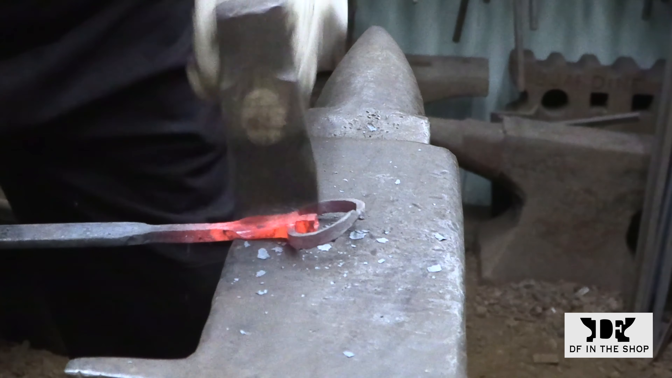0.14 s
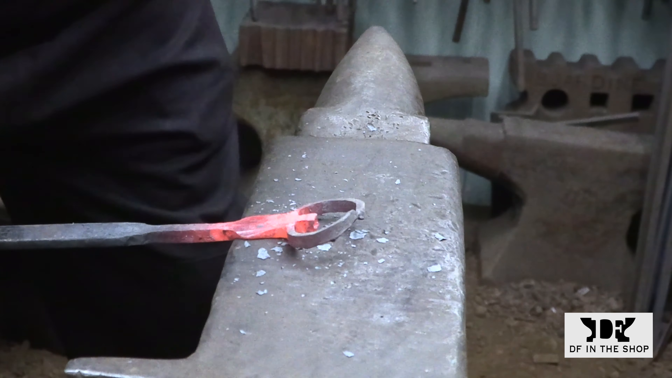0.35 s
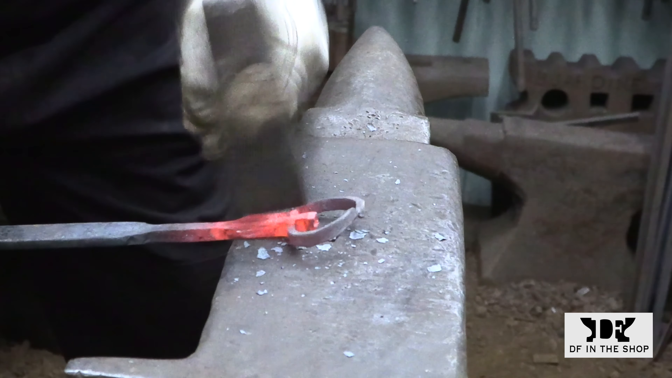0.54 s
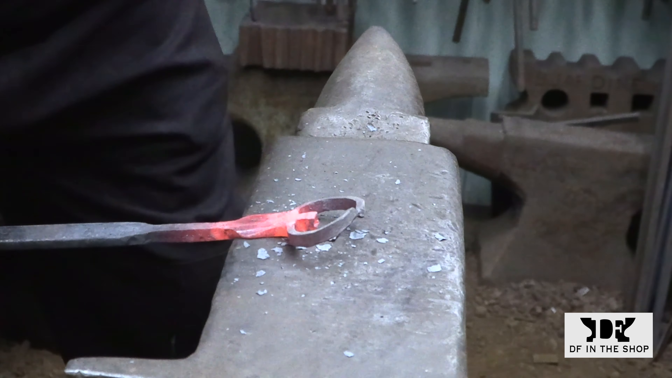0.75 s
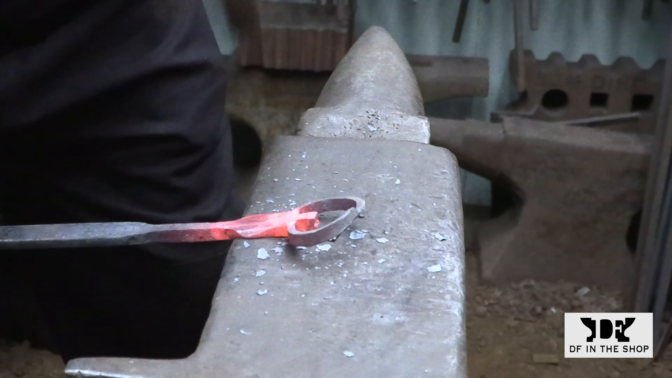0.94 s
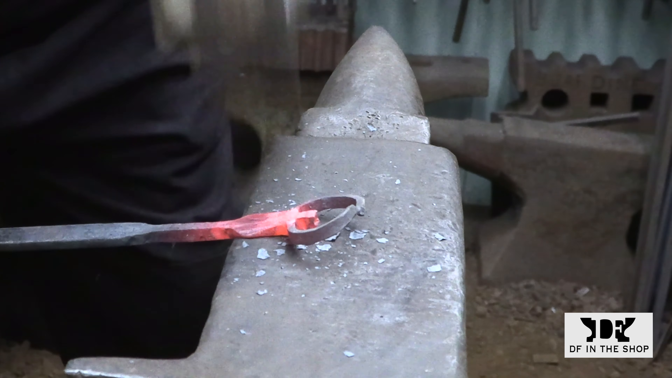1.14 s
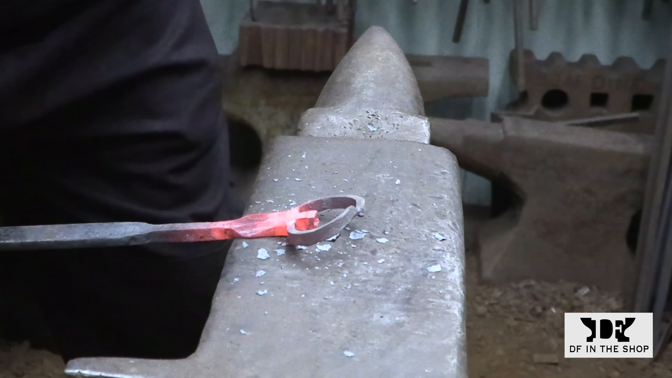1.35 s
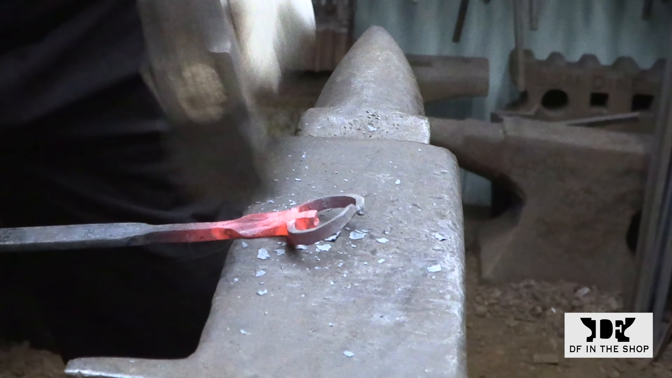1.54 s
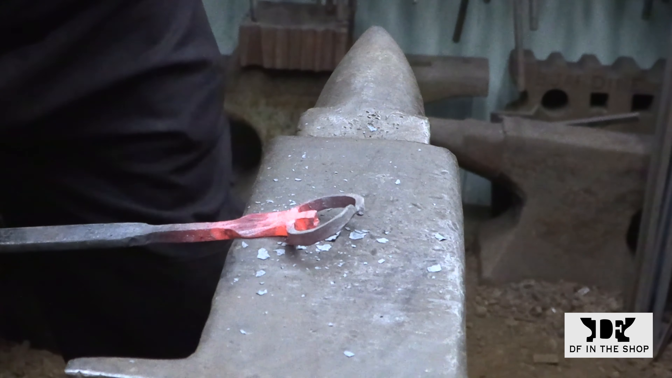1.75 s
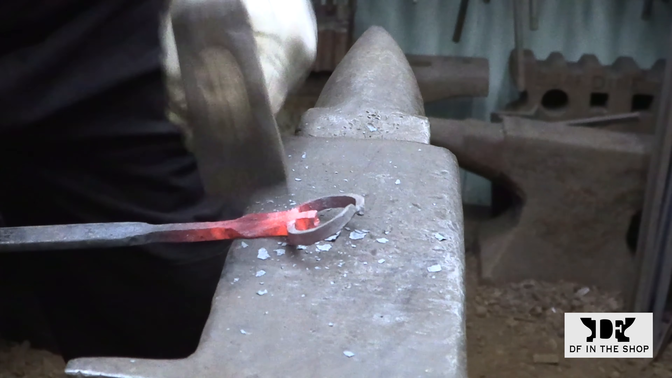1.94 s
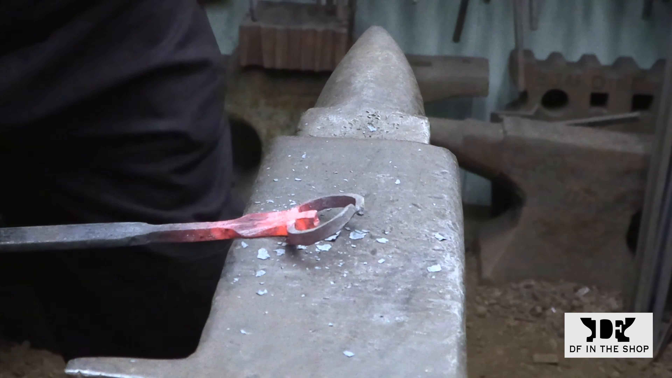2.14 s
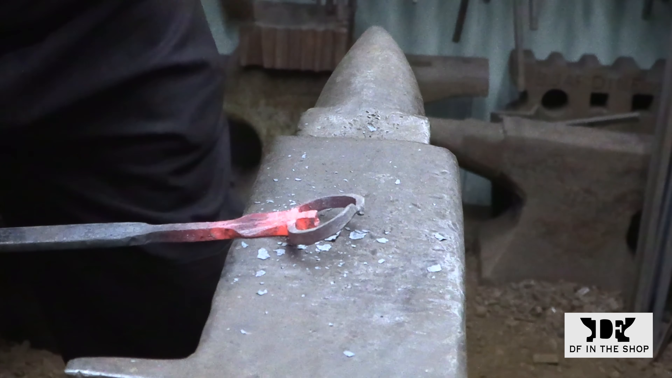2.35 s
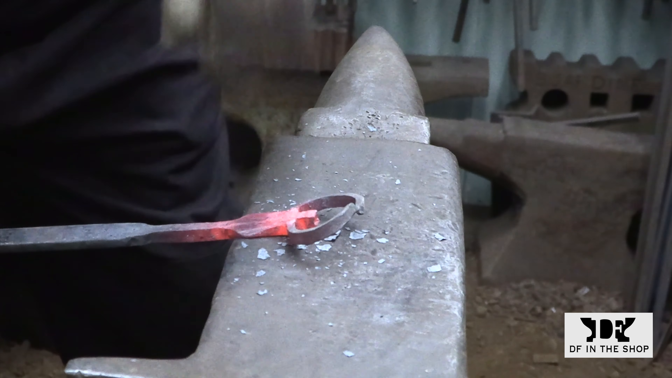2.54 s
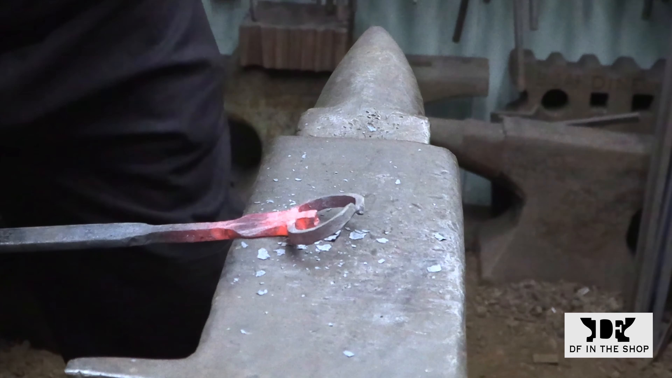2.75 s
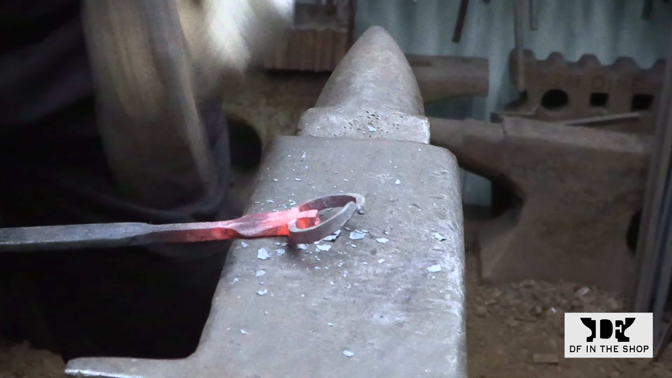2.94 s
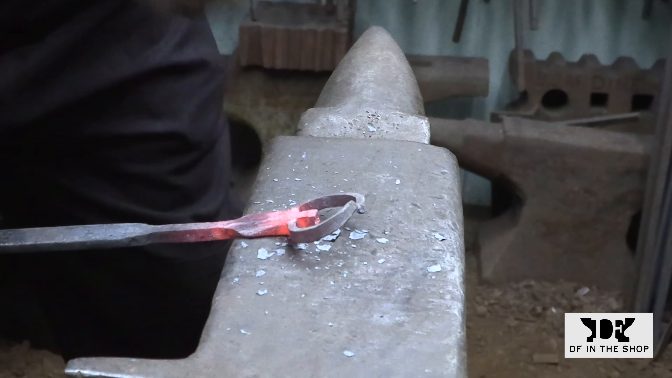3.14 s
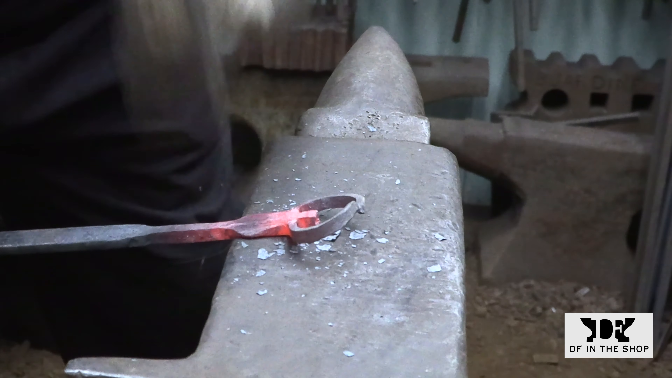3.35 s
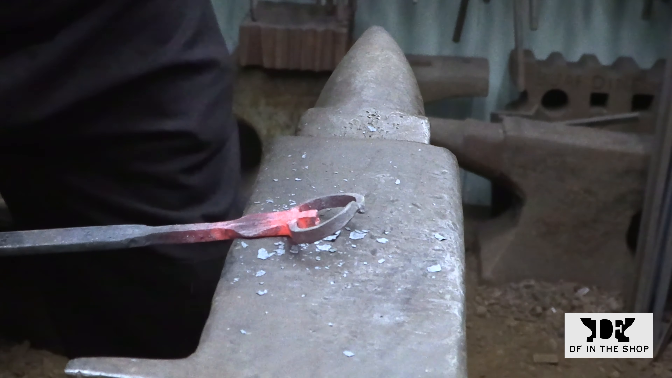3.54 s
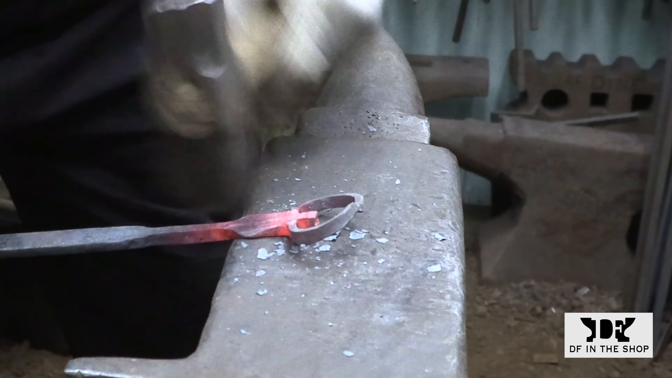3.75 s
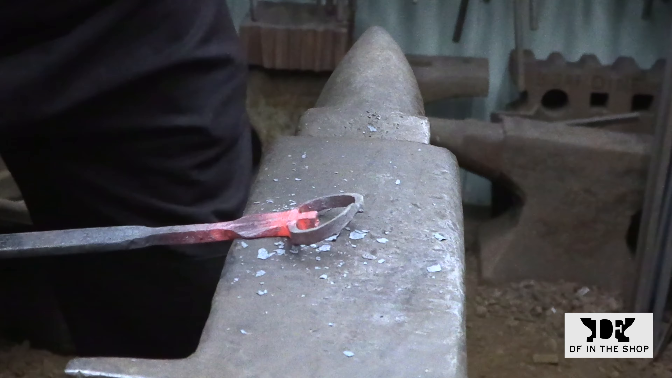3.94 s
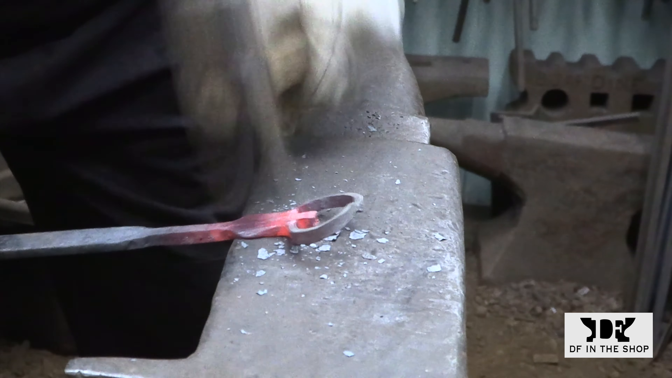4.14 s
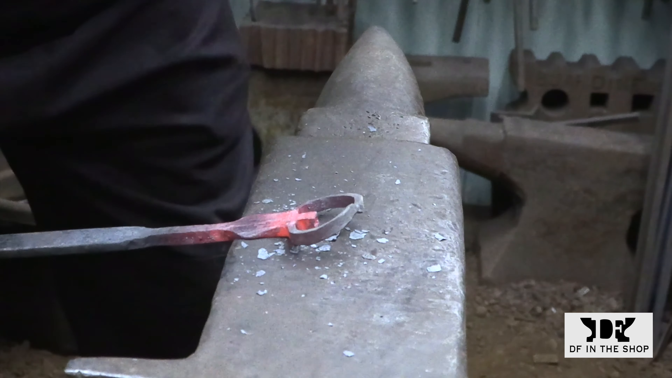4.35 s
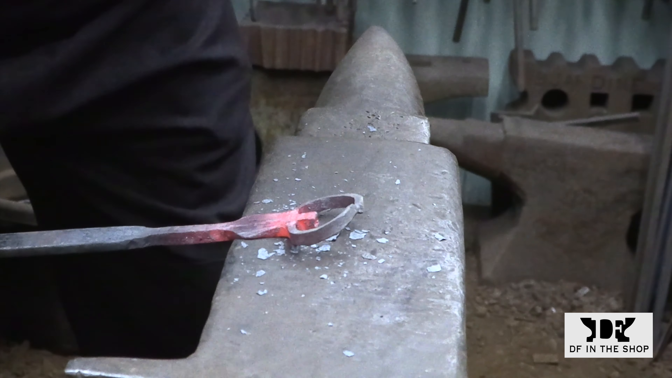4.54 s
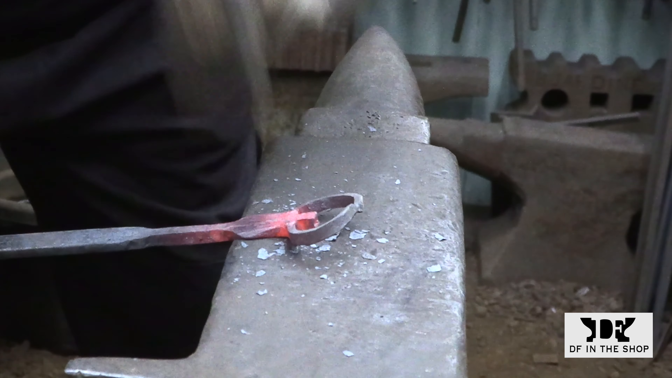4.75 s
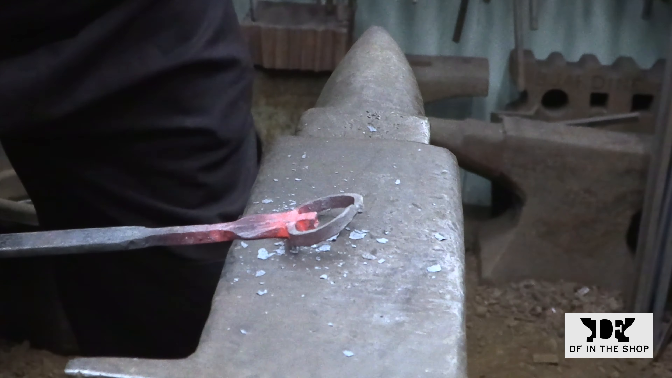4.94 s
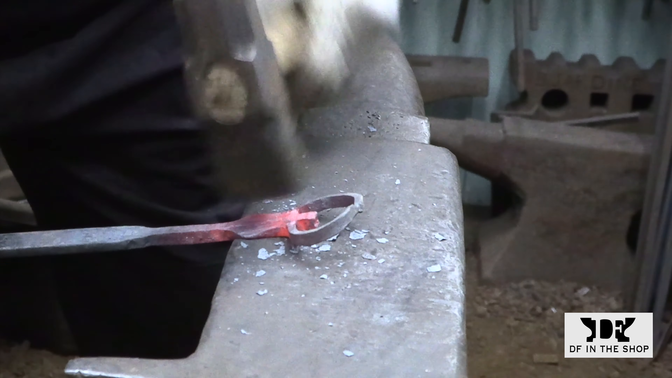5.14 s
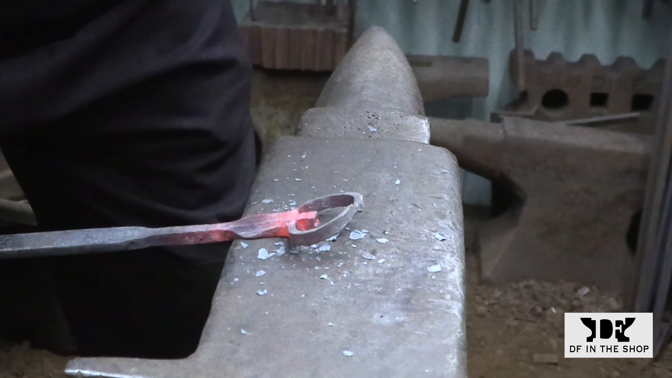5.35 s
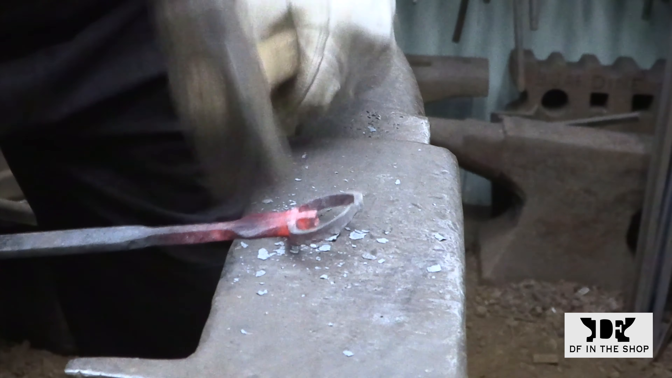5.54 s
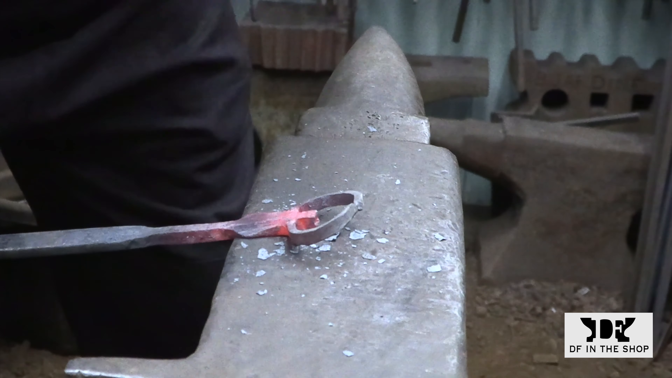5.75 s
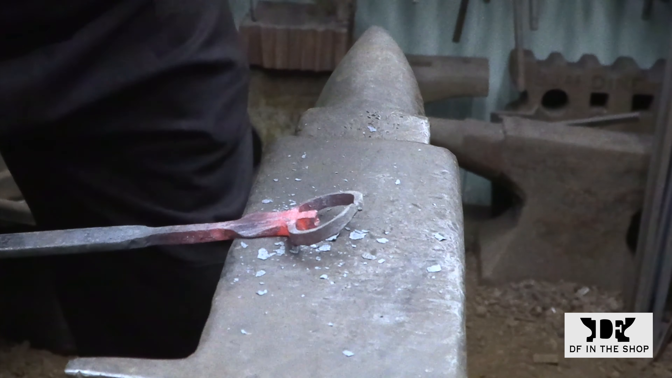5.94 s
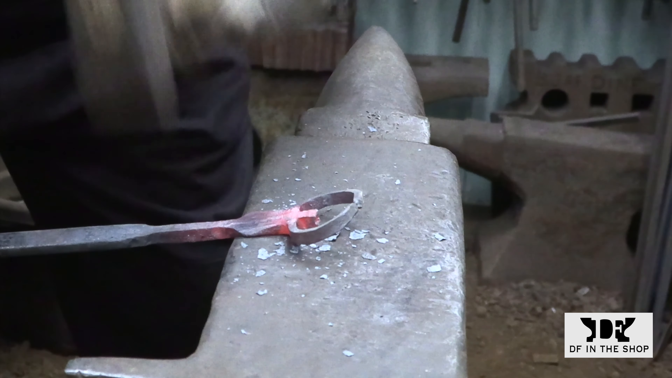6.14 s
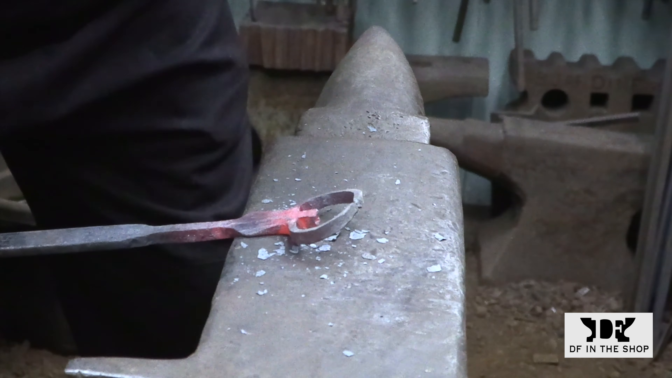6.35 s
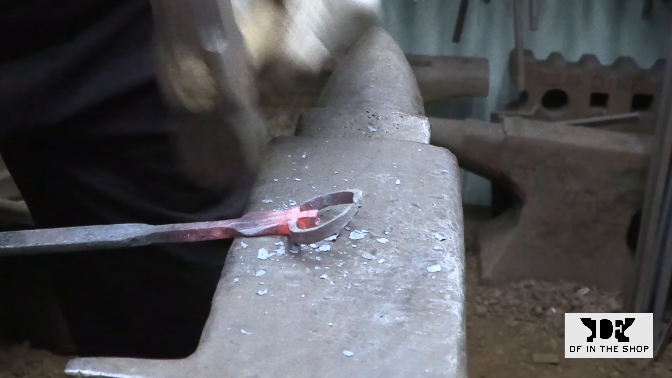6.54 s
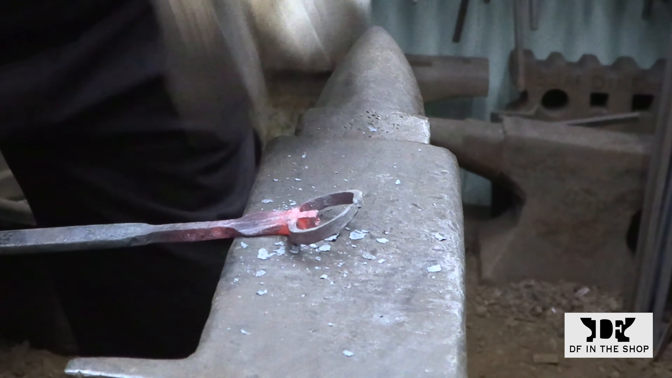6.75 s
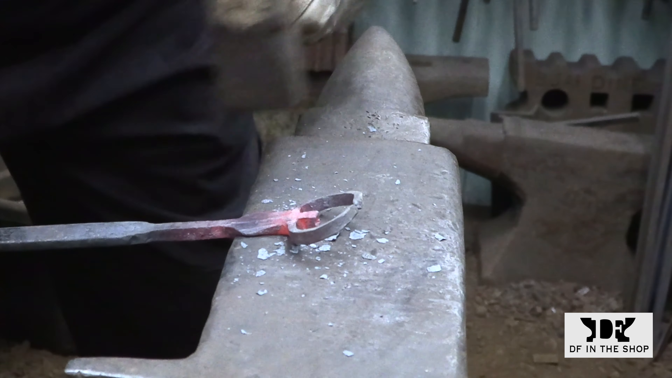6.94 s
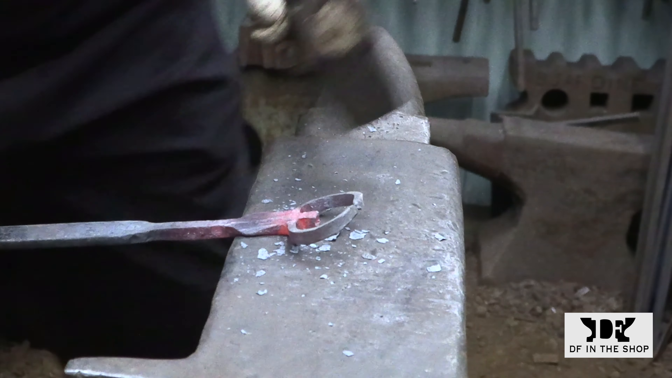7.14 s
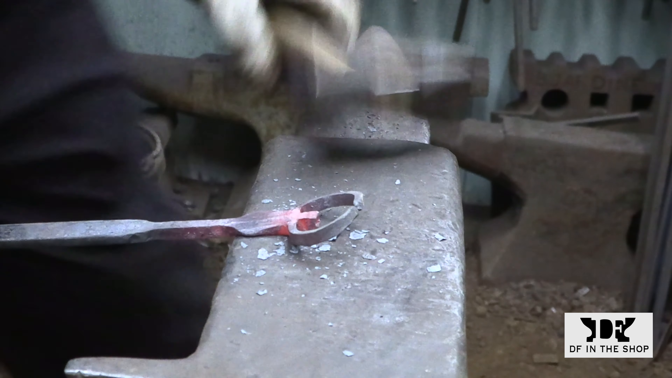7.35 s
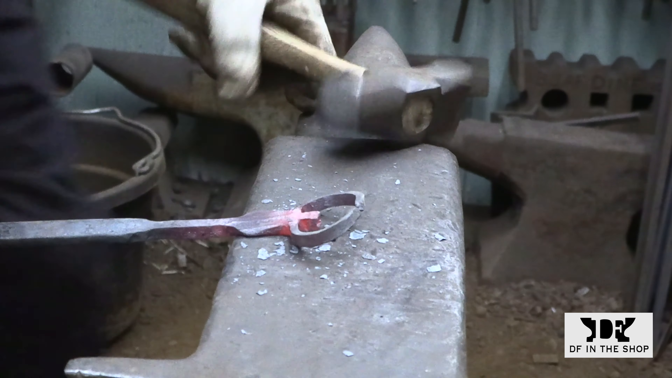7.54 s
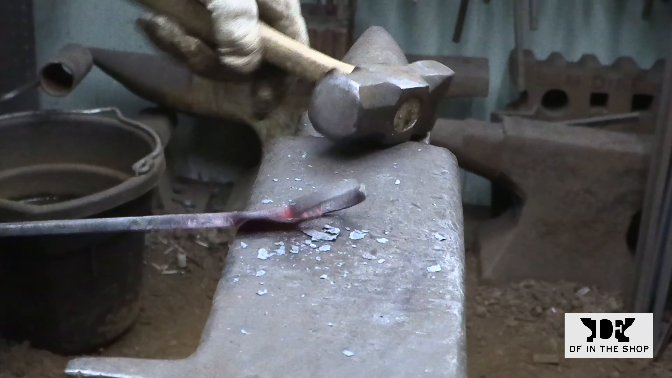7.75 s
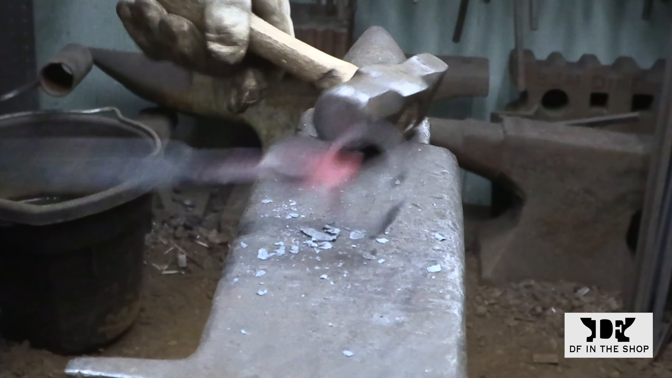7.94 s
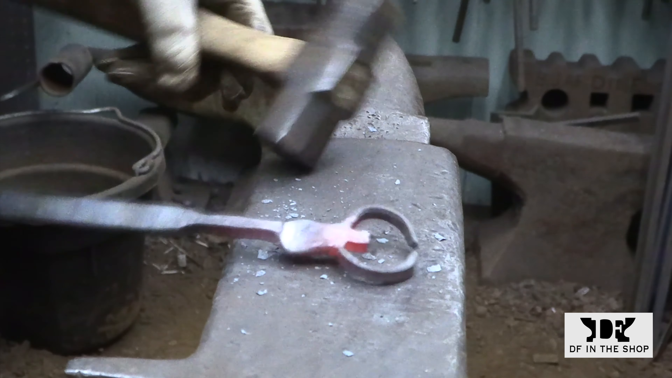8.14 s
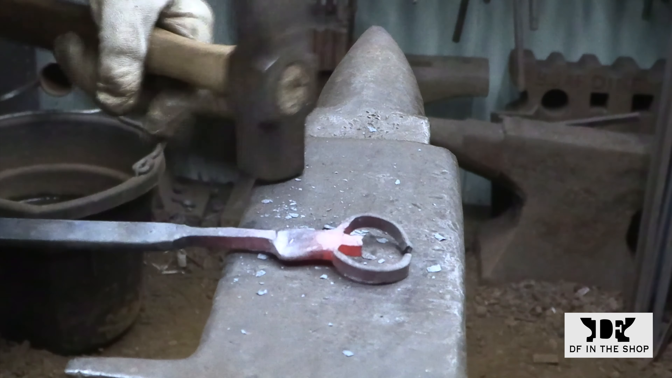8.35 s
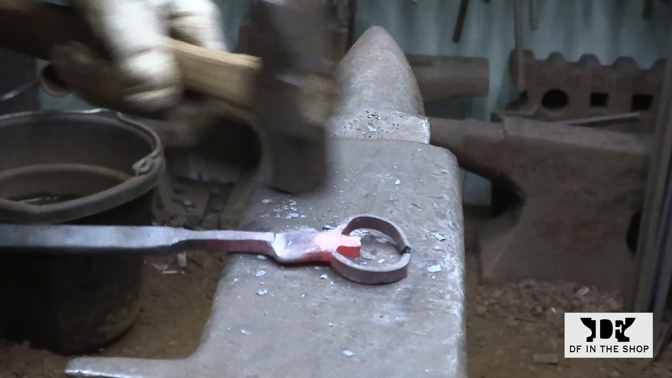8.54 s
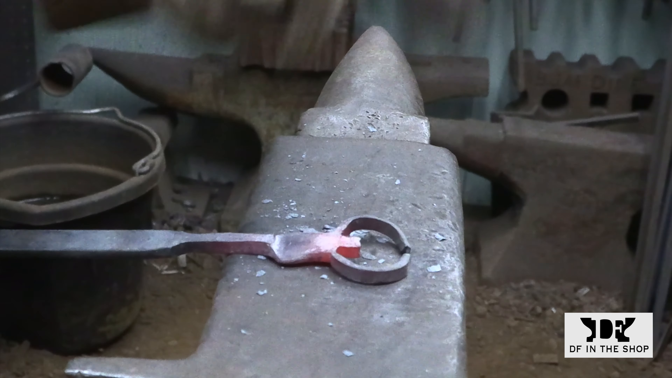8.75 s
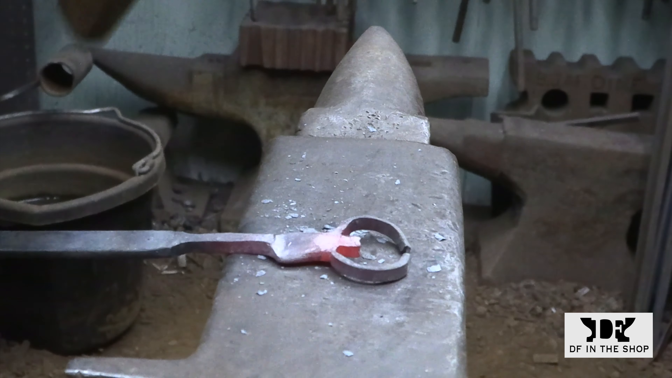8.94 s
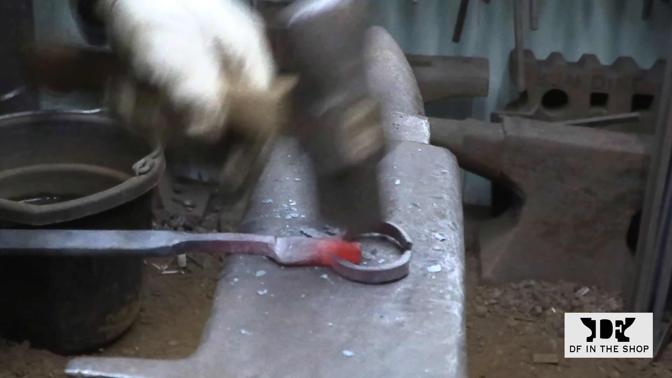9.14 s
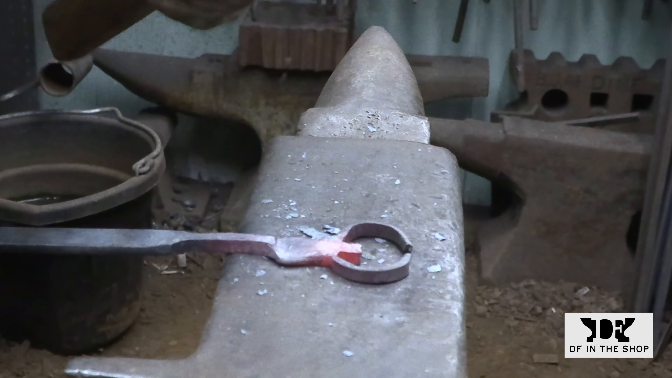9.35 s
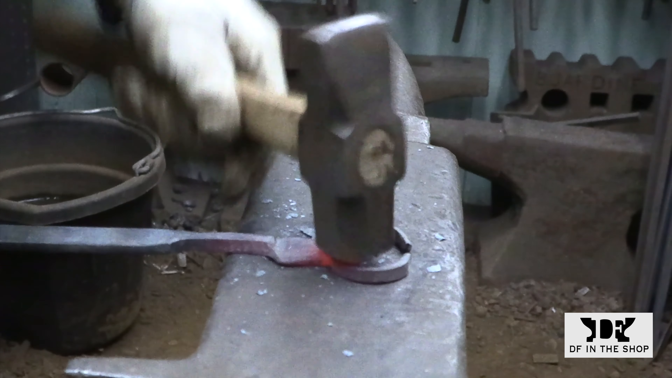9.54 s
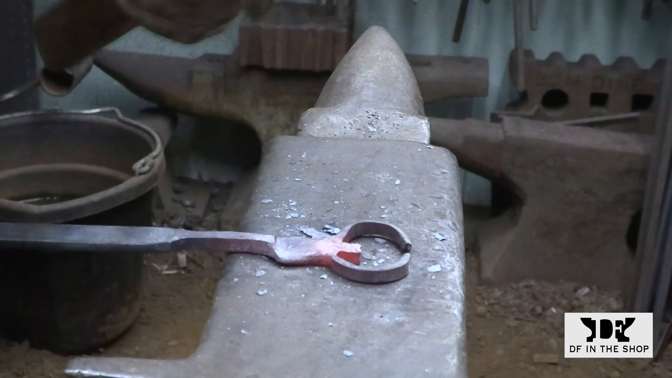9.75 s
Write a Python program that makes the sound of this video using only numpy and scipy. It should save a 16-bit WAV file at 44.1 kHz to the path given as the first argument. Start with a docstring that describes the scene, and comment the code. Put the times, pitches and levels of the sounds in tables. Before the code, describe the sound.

Close in a small forge, a hand hammer beats a hot steel bar on an anvil about twice a second, each blow a hard crack with a short, bright metallic clang. The last blows quicken and weaken. The hammer is laid down with a sharp clink and dull knocks, the bar scrapes and ticks as it is turned, then a flat thudding crack and one ringing blow finish.

```python
"""A small forge: a smith hammers a hot steel bar on an anvil, lays the hammer down, turns the bar, strikes twice more.
Contacts are a clean push plus scale crackle, convolved with one wall response.
Anvil, hammer head and bar ring as sums of decaying, wavering modes.
The bar's scrapes and the background are shaped noise; a gain control flattens the front of each blow."""
import sys
import numpy as np
from scipy import signal
from scipy.fft import rfft, irfft, next_fast_len
from scipy.io import wavfile
from scipy.ndimage import uniform_filter1d, minimum_filter1d, map_coordinates

SR = 44100
rng = np.random.default_rng(int(sys.argv[2]) if len(sys.argv) > 2 else 0)


def inscribe(sig):
    """Save sig as 16-bit PCM at rate SR to the path in sys.argv[1].

    A 1-D sig is mono; a 2-D sig holds one channel per row.
    Samples are clipped to [-1, 1] before scaling.
    """
    pcm = np.round(np.clip(np.atleast_2d(sig).T, -1, 1) * 32767)
    wavfile.write(sys.argv[1], SR, pcm.astype(np.int16))


N = 431298
SIZE = 32768  # contact and wall response [samples]
TOP_HZ = 15900
COOLING_DB_PER_S = 0.73  # the steel hardens as it cools: bar and hammer ring more
WANDER_DB_PER_S = 1.5  # the blows wander along the face: the side notes fade
THUD_DB_PER_HARDNESS_DB, FIZZ_DB_PER_HARDNESS_DB = .4, 1.3  # bass lost, fizz gained

# All table levels are relative.
# Blows on the flat-lying bar: (time [s], force [dB], hardness [dB], anvil's main high note [dB])
BLOWS = [(0.1239, -7, -2, 1.5), (0.5941, -5.5, -.5, -2), (1.0578, -5.5, -1, -2), (1.5301, -6, 0, 7),
         (1.9916, -5.5, 2.5, -2.5), (2.4656, -6, .5, 2), (2.9037, -8, 1, 4), (3.2885, -9, 2, -7),
         (3.73, -8, -0.5, 5.5), (4.2154, -4.5, 1, -0.5), (4.6793, -4.5, -0.5, 6.5), (5.145, -5, -0.5, 7.5),
         (5.6058, -6, -0.5, 6), (6.0659, -6.5, 1.5, 2), (6.5195, -9, -1, -10), (6.8591, -8.5, -0.5, -11.5),
         (7.1334, -12, -3.5, -23.5), (9.5518, -5.5, -1.5, -1.5)]
# Hammer head laid on the anvil, rocking, tipped up, lifted: (time [s], force [dB], hardness [dB])
HAMMER_KNOCKS = [(7.393, -37, -11), (7.4249, -6, 7), (7.595, -25, -22), (7.621, -22.5, -21.5),
                 (8.096, -25.5, -13), (8.14, -27, -10.5), (8.801, -40.5, -11)]
# Bar shifted, lifted, turned, set down: (time [s], force [dB], hardness [dB], thud [dB], ring [dB])
BAR_KNOCKS = [(7.743, -40, -5.5, 14, -20), (7.785, -39, -8, -6, -15), (7.867, -34.5, -1, -9, 7),
              (8.182, -29, 7.5, -1, -4.5), (8.235, -33.5, -2.5, 7.5, -6), (8.382, -47.5, -8, 8.5, -10)]
# Bar dragged over loose scale: (start [s], length [s], level [dB])
DRAGS = [(7.72, .52, -63), (8.256, 0.87, -69)]

# Anvil on its stand, modes: (frequency [Hz], level [dB], t60 [s], swell [s])
ANVIL_MODES = [(61.5, -50, 0.98, .05), (76, -57.5, 1.1, 0.06), (126, -52.5, .9, 0.027),
               (147, -38.5, 0.29, 0.0029), (210, -37.5, 0.13, 0.0017), (311, -60.5, 4.5, .01),
               (329, -32, 0.4, 0.041), (441, -23.5, 0.25, 0.0019), (476, -24.5, .18, 0.0018),
               (578, -30, 0.32, 0.0033), (796, -36.5, 0.51, 0.0039), (779, -29, 0.32, 0.002),
               (836, -29, 0.35, 0.0027), (1315, -27, 0.12, 0.0045), (1716, -29, 0.31, 0.0045),
               (1908, -29, 0.29, 0.0026), (2026, -21.5, .22, 0.0014), (2503, -31, 0.38, 0.0055),
               (2940, -27, 0.18, 0.0071), (3290, -28, 0.26, 0.0045), (3590, -32.5, 0.2, 0.0043),
               (4230, -39, 0.16, .004), (5500, -33, 0.18, 0.0032), (7380, -36, 0.33, 0.0014),
               (7900, -48.5, 0.38, .004), (9260, -24.5, 0.16, 0.00063), (9420, -29.5, 0.15, 0.00067),
               (12400, -46, .2, .002), (12946, -54.5, .25, .004)]
# Anvil, strongest bending modes: (frequency [Hz], level [dB], t60 [s], swell [s])
CLANG_MODES = [(1546, -6.5, 0.2, 0.034), (1581, -20, 0.24, 0.025)]
# Anvil, high lasting notes: (frequency [Hz], level [dB], t60 [s], swell [s])
SING_MODES = [(6290, -33, 0.28, 0.012), (7938, -22.5, 0.41, .004), (9330, -25.5, 0.2, 0.00064),
              (11020, -35, 0.22, 0.0059), (10900, -46.5, 0.21, .004)]
# Hammer head, modes: (frequency [Hz], level [dB], t60 [s], swell [s])
HAMMER_MODES = [(1175, -26.5, 0.28, .006), (1540, -25.5, 0.12, .006), (1560, -21.5, .3, 0.0042),
                (2444, -22.5, 0.31, 0.0026), (3715, -22, 0.3, .004), (4066, -32.5, .2, .004),
                (5560, -31, .34, .004), (6150, -32, 0.25, .004), (7530, -26, 0.15, .002),
                (7666, -29, 0.31, 0.0023), (10930, -29.5, 0.3, 0.0022), (12600, -41, .28, .002)]
# Bar and its forged loop, modes: (frequency [Hz], level [dB], t60 [s], swell [s])
BAR_MODES = [(1220, -28.5, 0.28, .003), (2044, -23, 0.45, .003), (2950, -25, 0.46, .003),
             (3315, -20.5, 0.23, .002), (3400, -25.5, 0.33, .002), (5560, -25.5, 0.23, .002),
             (6200, -32.5, 0.17, 0.0017), (7120, -34, 0.53, .002), (8037, -27.5, 0.47, .002)]

# Spectrum of one contact: (frequency [Hz], density [dB per Hz])
CONTACT_SPECTRUM = [(30, -35), (100, -24), (150, -15.5), (300, -4.5), (450, -0.5), (700, -3.5), (1400, 0),
                    (3100, 0), (3700, -8), (7800, -10.5), (9800, -15.5), (11500, -24.5), (14000, -31),
                    (16000, -44)]
# Colour of the blow that beats the bar down onto the face: (frequency [Hz], level [dB])
FLATTENING_COLOUR = [(70, 12), (250, 4.5), (700, 7), (1500, -0.5), (2900, -0.5), (4500, 6), (7500, 10),
                     (10000, 2.5)]
# The hot steel damps the head's low modes during a blow: (frequency [Hz], level [dB])
HEAD_DAMPING = [(4200, -10), (5400, 3), (7000, -4), (11000, -3)]
# Decay of the wall echoes: (frequency [Hz], t60 [s])
WALL_DECAY = [(80, 0.37), (300, 0.29), (1000, 0.25), (3000, .25), (6000, .22), (12000, 0.19)]
# Stereo width: (frequency [Hz], side level [dB])
WIDTH = [(100, -19), (300, -20), (700, -13), (1400, -10.5), (2800, -8), (7000, -4.5), (12000, -7.5)]
# Spectrum of the scrape: (frequency [Hz], density [dB per Hz])
GRIT_SPECTRUM = [(180, -55), (300, -33), (359, 1), (467, -7.5), (597, -1.5), (801, -3), (2920, -5.5),
                 (11400, -26.5), (15000, -49)]
# Spectrum of the background: (frequency [Hz], density [dB per Hz])
AIR_SPECTRUM = [(25, -24.5), (45, -16), (62, 2), (90, -7), (120, 2), (200, -2.5), (400, -5.5), (1000, -10),
                (3000, -8), (4000, -13.5), (8000, -18.5), (11000, -27.5), (16000, -45)]


def amp(db):
    """Decibels to gain."""
    return 10 ** (np.asarray(db) / 20)


def unit(x):
    """x at rms 1."""
    return x / np.sqrt(np.mean(x ** 2) + 1e-20)


def along(points, hz):
    """(frequency [Hz], value) points interpolated on a log frequency axis."""
    point_hz, value = np.transpose(points)
    return np.interp(np.log(hz + 1), np.log(point_hz + 1), value)


def add(track, s, sound):
    """Mix a sound into the track from time s."""
    part = track[:, round(s * SR):][:, :sound.shape[-1]]
    part += sound[..., :part.shape[1]]


def wobble(rate_hz, size):
    """Smooth random curve with rate_hz knots a second."""
    knots = rng.standard_normal(int(size * rate_hz / SR) + 4)
    return map_coordinates(knots, [np.arange(size) * rate_hz / SR])


def filtered(x, response):
    """x filtered by a response given as a function of frequency."""
    size = x.shape[-1]
    padded = next_fast_len(size + SIZE // 4)
    spectrum = rfft(x, padded) * response(np.fft.rfftfreq(padded, 1 / SR))
    return irfft(spectrum, padded)[..., :size]


def causal(gain):
    """Minimum-phase response with this gain, by folding the cepstrum."""
    cepstrum = irfft(np.log(gain))
    fold = np.r_[1, np.full(SIZE // 2 - 1, 2), np.zeros(SIZE // 2)]
    return np.exp(rfft(cepstrum * fold))


def diffuse(size):
    """Stereo white noise: near mono in the bass, wider in the treble."""
    mid, side = rng.standard_normal((2, size))
    side = filtered(side, lambda hz: amp(along(WIDTH, hz)))
    return np.array([mid + side, mid - side])


def air(air_db=-75, drift_db=0.5):
    """Quiet background of the shop: shaped noise with a slight level drift."""
    noise = unit(filtered(diffuse(N), lambda hz: amp(along(AIR_SPECTRUM, hz))))
    return noise * amp(air_db + drift_db * wobble(3.6, N))


def sliding(slide_db=2, grain_db=2):
    """Bar on loose scale: faint uneven noise that swells and fades with each drag."""
    t = np.arange(N) / SR
    level = np.zeros(N)
    for start_s, length_s, db in DRAGS:
        progress = np.clip((t - start_s) / length_s, 0, 1)
        level += amp(db) * np.sqrt(np.abs(np.sin(np.pi * progress)))
    grit = unit(filtered(diffuse(N), lambda hz: amp(along(GRIT_SPECTRUM, hz))))
    return grit * level * amp(slide_db + grain_db * wobble(70, N))


def workshop(direct_db=-13, linger_db=-54, linger_t60_s=4.2):
    """Wall response: direct sound, dense noise echoes decaying per band, a faint slow tail."""
    hz, t, noise = signal.stft(diffuse(SIZE), SR, nperseg=256)
    hz = hz[:, None]
    walls = amp(-60 * t / along(WALL_DECAY, hz))
    linger = amp(linger_db - 60 * t / linger_t60_s) / (1 + (hz / 3200) ** 4)
    path = signal.istft(noise * (walls + linger), SR, nperseg=256)[1][:, :SIZE]
    path *= 1 - np.exp(-np.arange(SIZE) / SR / 0.001)  # echoes build up over about 1 ms
    path /= np.linalg.norm(path[0])
    path[:, 0] -= amp(direct_db)
    return rfft(path)


def contact(path, colour, crush_t60_s, crush_hz, crush_share=.45):
    """One contact: a clean push, joined above crush_hz by the random crackle of crushed scale."""
    hz, t = np.fft.rfftfreq(SIZE, 1 / SR), np.arange(SIZE) / SR
    crackle = rng.standard_normal(SIZE) * amp(-60 * t / crush_t60_s)
    crackle /= np.linalg.norm(crackle)
    share = crush_share * hz ** 2 / (hz ** 2 + crush_hz ** 2)  # crackle's share of the energy
    push = causal(np.sqrt(1 - share))
    force = push + causal(np.sqrt(share + 1e-6)) * rfft(crackle)
    spectrum = causal(amp(along(CONTACT_SPECTRUM, hz) + along(colour, hz)))
    return irfft(path * force * spectrum) * np.minimum(1, 10 * (t[-1] - t))  # 0.1 s fade-out


def ring(modes, colour, scatter_db, waver):
    """Modes at random strengths; echoes make each swell and waver differently in the two channels."""
    out = np.zeros((2, 2 * SR))
    for hz, db, t60_s, swell_s in modes:
        t = np.arange(min(int(1.3 * t60_s * SR), 2 * SR)) / SR
        strength_db = db + along(colour, hz) + scatter_db * rng.standard_normal()
        level = amp(strength_db - 60 * t / t60_s) * (1 - np.exp(-(t / swell_s) ** 2))
        phase = 2 * np.pi * (hz * t + rng.random())
        # a lasting mode is a narrow line, so it wavers slowly
        knots_s = np.arange(20) * t60_s / 14
        curves = rng.standard_normal((3, len(knots_s)))
        flutter, drift, spread = (np.interp(t, knots_s, row) for row in curves)
        mid = (1 + waver * flutter) * np.sin(phase) + waver * drift * np.cos(phase)
        side = amp(along(WIDTH, hz)) * (np.cos(phase) + spread * np.sin(phase)) / np.sqrt(2)
        out[:, :len(t)] += level * np.array([mid + side, mid - side])
    return out


def touch(hardness_db, thud_db, treble_db, fizz_db):
    """Contact colour (frequency [Hz], level [dB]): a harder, shorter one is brighter and thuds less."""
    thud = thud_db - THUD_DB_PER_HARDNESS_DB * hardness_db
    treble = treble_db + hardness_db
    fizz = fizz_db + FIZZ_DB_PER_HARDNESS_DB * hardness_db
    return [(450, thud), (1200, 0), (2600, 0), (4500, treble), (7500, treble), (10000, fizz)]


def singing(s, main_db, low_db=10, middle_db=0, high_db=6.5):
    """High-note strengths (frequency [Hz], level [dB]): the main one depends on the landing spot."""
    fade_db = WANDER_DB_PER_S * s
    return [(6300, low_db - fade_db), (7600, main_db), (8300, main_db),
            (9300, middle_db), (10800, high_db - fade_db)]


def handling(path, hammer_contact_db=25, head_db=4, head_treble_db=-8, bar_contact_db=26):
    """Hammer laid down and rocking, bar turned and set down: contacts with long crackle, plus rings."""
    out = np.zeros((2, N))
    crush = dict(crush_t60_s=0.11, crush_hz=900)
    for s, force_db, hardness_db in HAMMER_KNOCKS:
        colour = touch(hardness_db, thud_db=-3, treble_db=0, fizz_db=-12.5)
        head_colour = touch(hardness_db, thud_db=-2, treble_db=head_treble_db, fizz_db=head_treble_db - 6)
        add(out, s, amp(force_db + hammer_contact_db) * contact(path, colour, **crush))
        add(out, s, amp(force_db + head_db) * ring(HAMMER_MODES, head_colour, scatter_db=1, waver=.4))
    for s, force_db, hardness_db, thud_db, ring_db in BAR_KNOCKS:
        colour = touch(hardness_db, thud_db, treble_db=0, fizz_db=-1.5)
        add(out, s, amp(force_db + bar_contact_db) * contact(path, colour, **crush))
        add(out, s, amp(force_db + ring_db) * ring(BAR_MODES, colour, scatter_db=2, waver=.4))
    return out


def flattening(path, s=9.1754, contact_db=13, body_db=-18, sing_db=-15):
    """First blow after the turn beats the bar down onto the face: thud and crack, no clang."""
    out = np.zeros((2, N))
    add(out, s, amp(contact_db) * contact(path, FLATTENING_COLOUR, crush_t60_s=0.018, crush_hz=2270))
    add(out, s, amp(body_db) * ring(ANVIL_MODES, FLATTENING_COLOUR, scatter_db=2, waver=.4))
    add(out, s, amp(sing_db) * ring(SING_MODES, singing(s, main_db=0), scatter_db=1, waver=.2))
    return out


def hammering(path, contact_db=26, body_db=-2, clang_db=2, sing_db=-1, bar_db=-19, head_db=-15):
    """Blows on the hot bar: contact plus anvil, bar and head modes; the landing spot sets the singing."""
    out = np.zeros((2, N))
    even = [(1000, 0)]  # flat colour
    for s, force_db, hardness_db, main_db in BLOWS:
        colour = touch(hardness_db, thud_db=-1.78, treble_db=-0.2, fizz_db=0.4)
        steel_db = force_db + COOLING_DB_PER_S * s
        notes = singing(s, main_db)
        add(out, s, amp(force_db + contact_db) * contact(path, colour, crush_t60_s=0.018, crush_hz=2220))
        add(out, s, amp(force_db + body_db) * ring(ANVIL_MODES, colour, scatter_db=2, waver=.4))
        add(out, s, amp(force_db + clang_db) * ring(CLANG_MODES, even, scatter_db=.5, waver=.15))
        add(out, s, amp(force_db + sing_db) * ring(SING_MODES, notes, scatter_db=1, waver=.2))
        add(out, s, amp(steel_db + bar_db) * ring(BAR_MODES, even, scatter_db=3, waver=.4))
        add(out, s, amp(steel_db + head_db) * ring(HAMMER_MODES, HEAD_DAMPING, scatter_db=2, waver=.4))
    return out


def scene():
    """Contacts share one wall response; the work sits slightly right over the background."""
    path = workshop()
    pan = amp([[-.25], [.25]])
    work = sliding() + handling(path) + flattening(path) + hammering(path)
    return air() + work * pan


def record(dry, threshold_db=-22):
    """Gain control ducks at once on loud sound, holds 25 ms, recovers quickly; then the band limit."""
    power = np.abs(uniform_filter1d(np.mean(dry ** 2, axis=0), size=130))
    level_db = 10 * np.log10(power + 1e-12)
    needed_db = -.75 * np.maximum(level_db - threshold_db, 0)  # 4:1
    held_db = minimum_filter1d(needed_db, size=1101, origin=550)  # window reaches back only
    gain = amp(uniform_filter1d(held_db, size=60))
    return filtered(dry * gain, lambda hz: hz < TOP_HZ)


dry = scene()
out = record(dry)
inscribe(out)
```